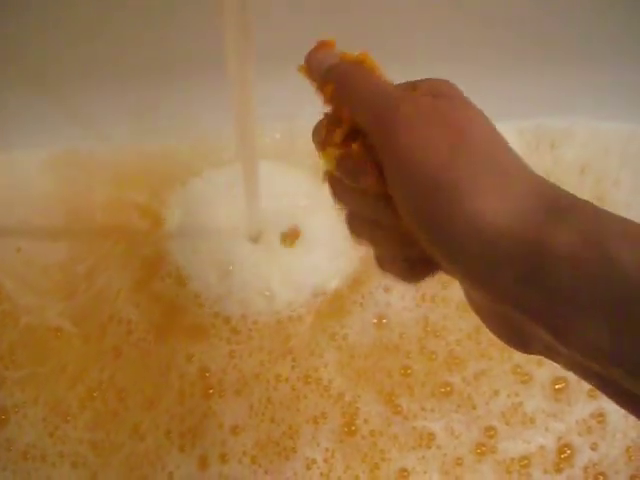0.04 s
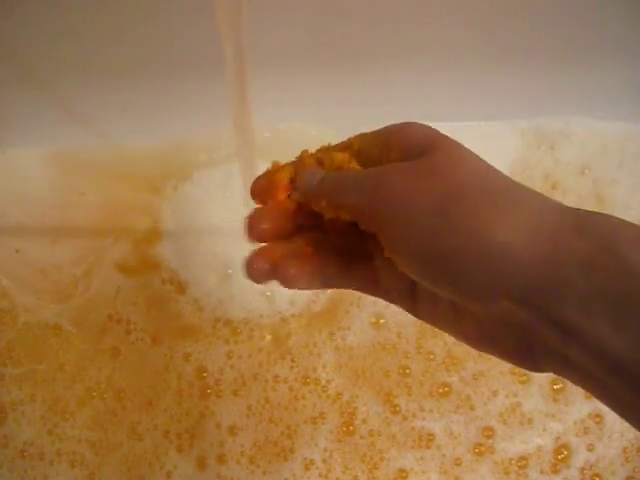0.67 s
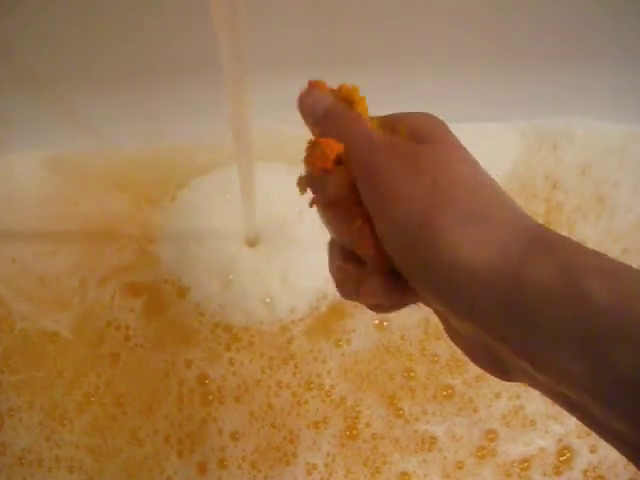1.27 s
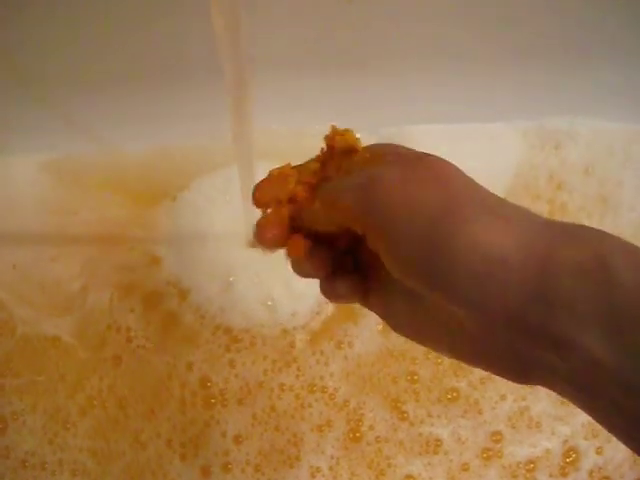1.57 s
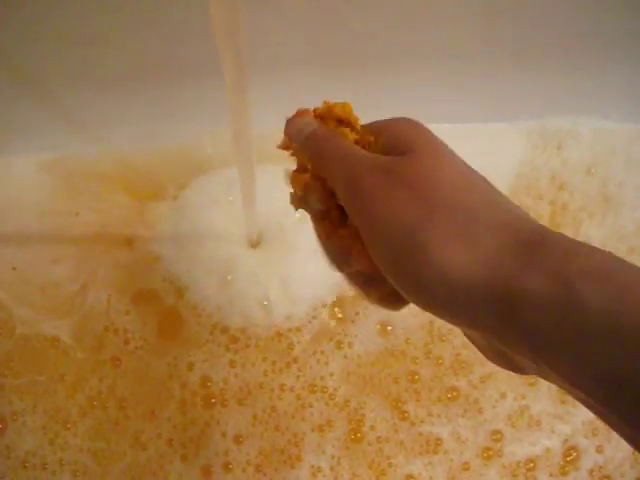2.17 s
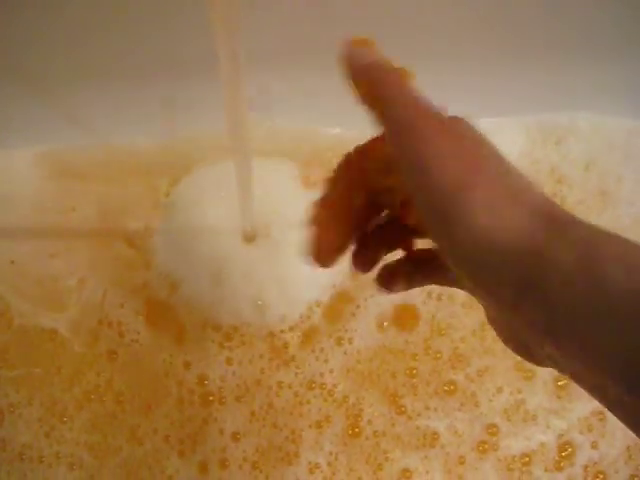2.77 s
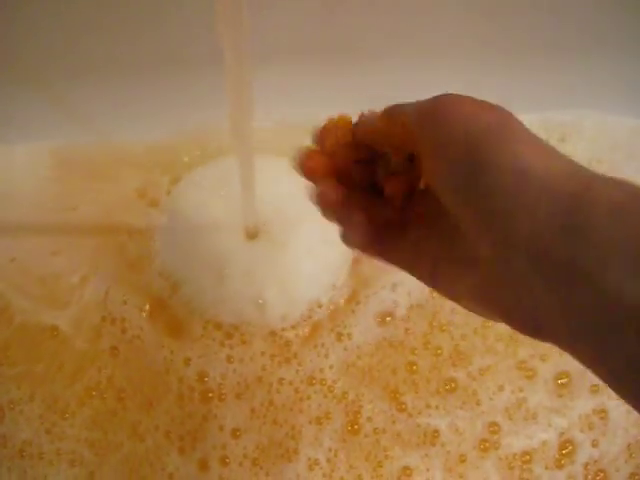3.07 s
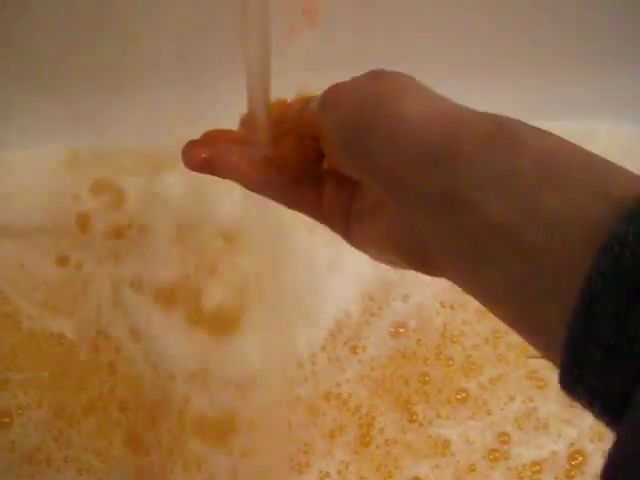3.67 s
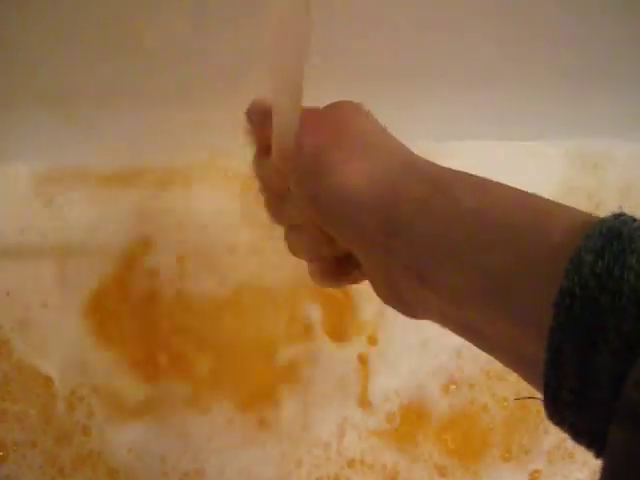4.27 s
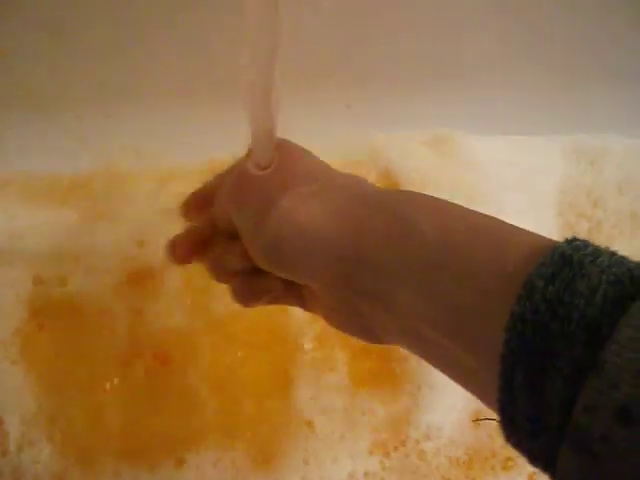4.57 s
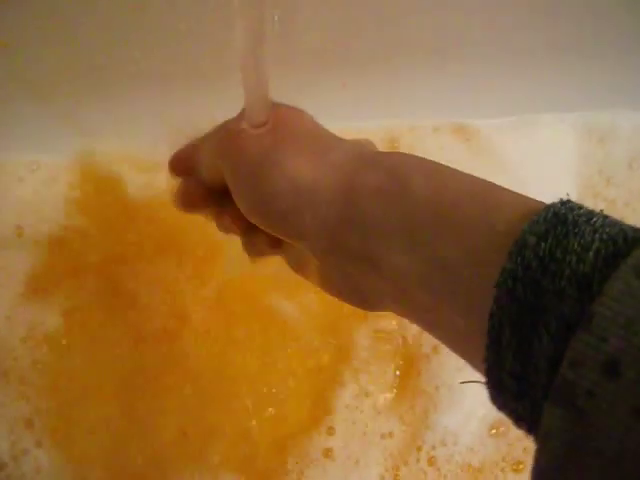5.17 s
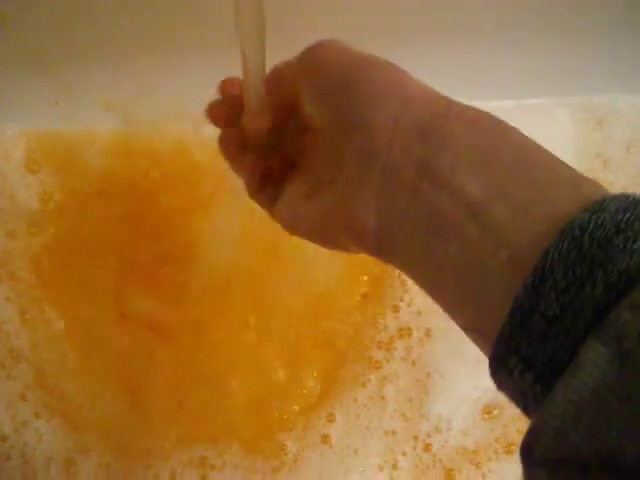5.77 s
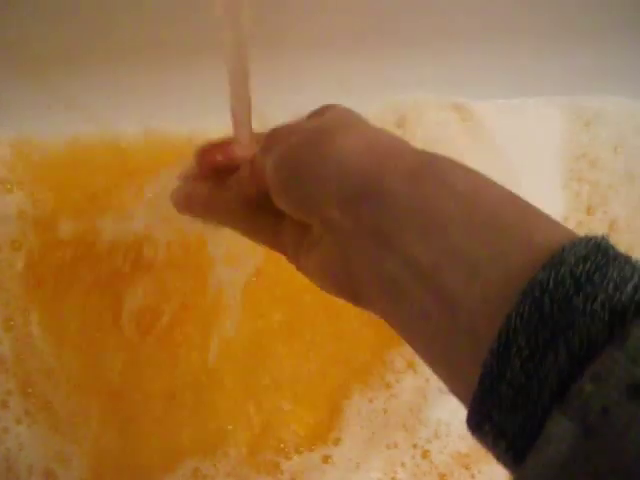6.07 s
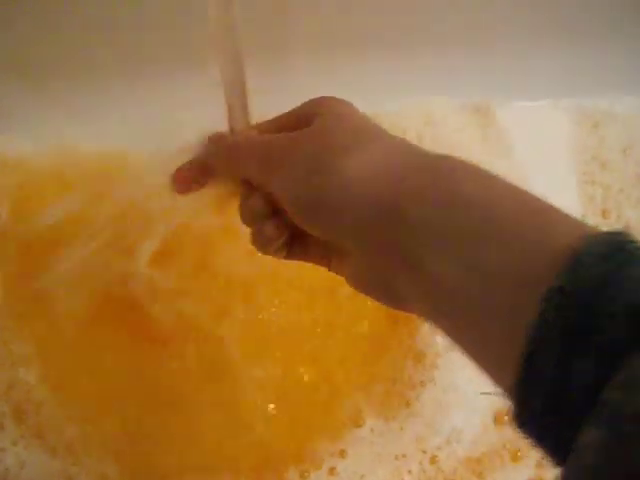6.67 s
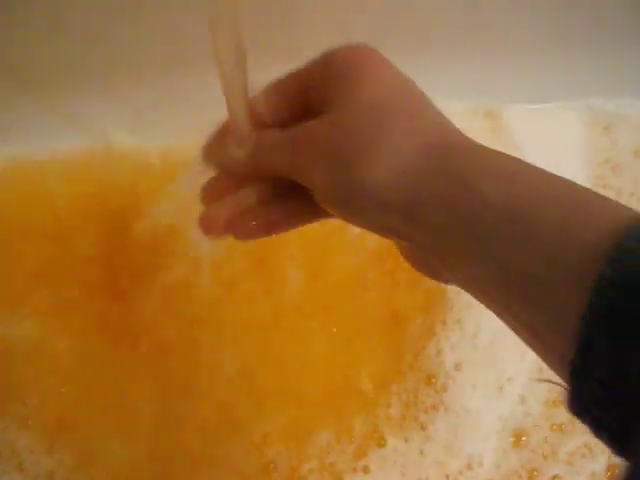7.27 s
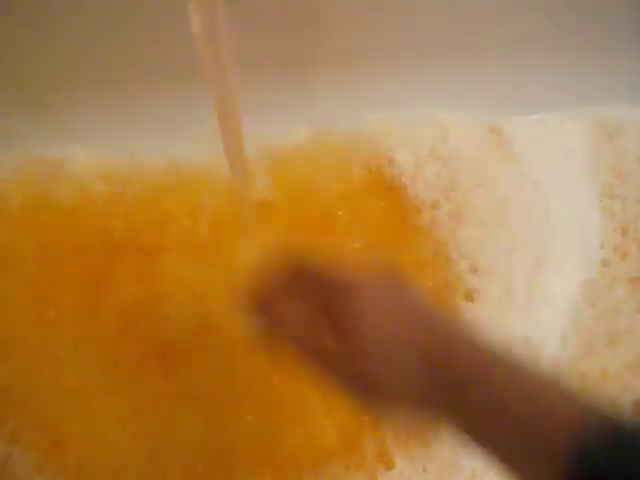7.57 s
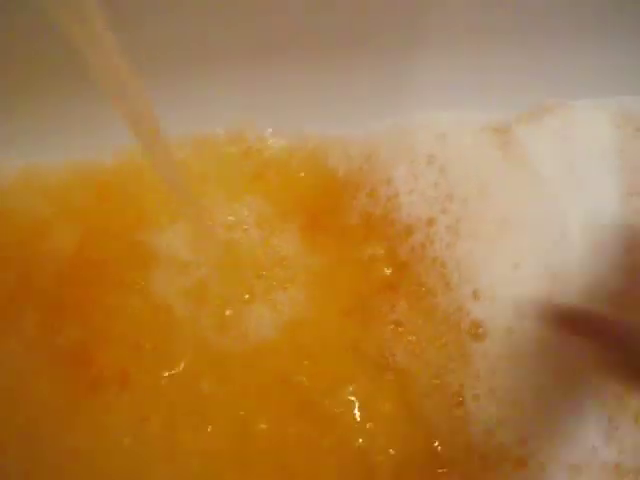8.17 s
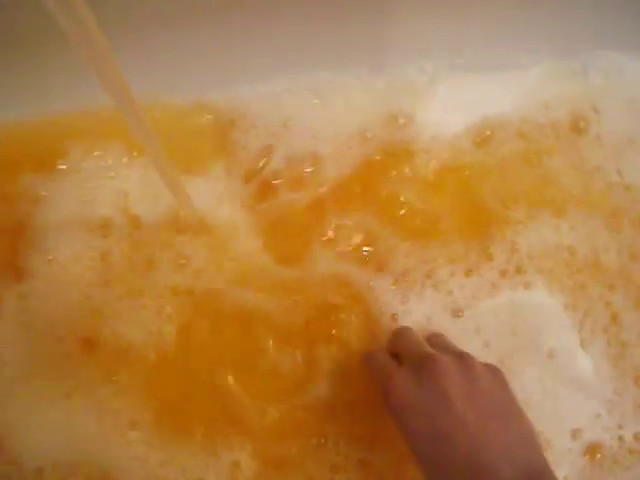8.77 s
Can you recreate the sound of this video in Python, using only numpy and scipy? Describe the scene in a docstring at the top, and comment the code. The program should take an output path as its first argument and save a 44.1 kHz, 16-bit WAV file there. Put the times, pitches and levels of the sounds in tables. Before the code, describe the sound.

Close above a bathtub in a small bathroom, running water gurgles softly under thick foam while the tub rumbles. The sound turns brighter and hissier as a hand cups the stream, filling and spilling in uneven splashes, with sharp drips and round gulps. The hand lets its last water fall with a splash and a few deep plops, leaving the stream to churn more heavily in open water.

```python
"""A bath tap pours into a foamy tub, heard from just above it in a small bathroom.
First the jet alone drives bubbles under the muffling foam; the tub booms and stray drops snap on top.
From about 3.5 s a hand under the stream fills and spills in turn, scattering bright spray,
plinks and gulping slops. Near 7.6 s it lets a last handful fall with low plops,
and the jet plunges into open water, fuller than before."""
import sys
import numpy as np
from scipy import signal
from scipy.fft import rfft, irfft, next_fast_len
from scipy.io import wavfile
from scipy.ndimage import uniform_filter1d, map_coordinates

SR = 44100
rng = np.random.default_rng(int(sys.argv[2]) if len(sys.argv) > 2 else 0)


def int16_out(signal):
    """Quantize to a 16-bit WAV file."""
    q = np.round(np.clip(np.atleast_2d(signal).T, -1, 1) * 32767)
    wavfile.write(sys.argv[1], SR, q.astype(np.int16))


N = 389403

# the jet's bed, weaker on the hand and stronger in open water: (time [s], level [dB])
JET_LEVEL = [(0, -35), (3.4, -35), (4.1, -39), (7.5, -38), (7.7, -28), (8.83, -30)]
# the cupped hand fills and less reaches the bath: (start [s], length [s])
HAND_HOLDS = [(3.547, 0.15), (4.005, 0.28), (5.337, 0.17), (5.976, 0.21), (7, 0.21)]
# the jet digs in and shakes the tub: (start [s], length [s], level [dB])
THUMPS = [(0.17, 0.18, -30), (0.573, 0.17, -30), (1.024, 0.1, -34.5), (1.442, 0.16, -32.5),
          (1.76, 0.13, -32), (2.645, 0.38, -30.5), (2.998, 0.33, -32.5), (3.477, 0.12, -34),
          (3.75, 0.32, -28.5), (4.196, 0.21, -35), (5.064, 0.17, -33.5), (7.115, 0.21, -36),
          (7.598, 0.17, -31.5), (7.726, 0.11, -26)]
# falling water drags air under: (start [s], length [s], large bubbles [dB], small bubbles [dB])
SURGES = [(0.16, 0.17, -36.5, -36.5), (0.34, 0.25, -39, -38), (0.916, 0.39, -35, -34.5),
          (1.478, 0.14, -38, -35.5), (1.653, 0.25, -34, -35), (2.365, 0.13, -34.5, -32),
          (2.707, 0.54, -38.5, -42.5), (3.21, 0.22, -34, -34.5), (3.69, 0.29, -37, -42),
          (4.233, 0.16, -42, -33.5), (4.855, 0.3, -47, -33.5), (5.056, 0.4, -39, -31),
          (5.447, 0.12, -36, -33.5), (5.607, 0.32, -58, -38), (6.203, 0.42, -36, -32),
          (6.534, 0.15, -33, -32.5), (6.783, 0.3, -45, -36.5), (7.63, 0.19, -34, -37),
          (8.31, 0.16, -45, -32)]
# steady patter off the hand, then off open water: (time [s], drops [dB], fine droplets [dB])
PATTER = [(3.5, -36, -38.5), (4.14, -59, -38.5), (4.3, -36, -37), (5.75, -32.5, -32), (6.07, -37, -35.5),
          (6.3, -34, -34.5), (7.05, -31.5, -35.5), (7.55, -32.5, -32.5), (7.75, -36, -40),
          (8.05, -31.5, -40), (8.47, -41, -50), (8.72, -34, -46.5)]
# the turning hand flings a sheet of water: (start [s], length [s], drops [dB], fine droplets [dB])
SPLASHES = [(3.496, 0.11, -38, -34.5), (3.774, 0.14, -33.5, -33.5), (3.907, 0.22, -35, -33),
            (4.178, 0.18, -31.5, -36), (4.376, 0.11, -32.5, -33), (4.52, 0.12, -36, -33.5),
            (4.69, 0.12, -32.5, -48), (5.199, 0.11, -26.5, -32.5), (5.797, 0.21, -32.5, -26),
            (6.161, 0.1, -29.5, -41), (6.314, 0.17, -31.5, -33), (7.148, 0.15, -28.5, -31),
            (7.307, 0.18, -30.5, -33.5), (7.578, 0.055, -22, -23), (7.626, 0.11, -30.5, -31),
            (7.81, 0.11, -30.5, -34), (8.374, 0.063, -32.5, -50)]
# stray drops on the foam: (time [s], peak [dB])
SNAPS = [(0.2105, -24.5), (0.2425, -21.5), (0.4403, -20), (0.581, -23), (0.694, -23.5), (0.7846, -24),
         (1.036, -26.5), (1.131, -24.5), (1.2145, -22.5), (1.445, -24.5), (1.5435, -19.5), (2.774, -19.5),
         (3.3093, -19)]
# a handful opens a cavity in the bath: (start [s], length [s], level [dB])
SLOSHES = [(3.687, 0.25, -38.5), (3.923, 0.51, -43), (7.702, 0.11, -36.5)]
# the last handful lands: (time [s], peak [dB], pitch [Hz])
PLOPS = [(7.612, -20, 86), (7.675, -19.5, 310), (7.752, -22, 115), (7.776, -24.5, 159)]
# sharp drop impacts: (time [s], peak [dB], pitch [Hz])
PLINKS = [(3.7752, -13.5, 4220), (3.8112, -17, 2840), (4.0203, -16, 2900), (4.2403, -15.5, 3040),
          (4.273, -9, 5150), (4.613, -15, 2470), (4.702, -14, 4430), (5.255, -11.5, 4340),
          (5.2701, -9, 4280), (5.2915, -13, 4130), (6.124, -11, 4730), (6.1547, -15.5, 3210),
          (6.6725, -15, 2800), (6.945, -14, 1960), (8.1519, -14, 3170), (8.378, -18.5, 2350)]
# a tongue of water slaps the bath: (start [s], length [s], starting level [dB])
SLAPS = [(4.235, .05, -29), (4.61, 0.046, -21.5), (5.2, .07, -22.5), (5.745, .04, -22.5),
         (5.85, .06, -21.5)]
# the hand tips out a glugging run: (start [s], length [s], starting level [dB])
SPILLS = [(4.391, .1, -24.5), (5.738, .07, -24), (7.17, 0.13, -22.5), (7.419, 0.13, -24)]
# single air pockets closing: (time [s], peak [dB], pitch [Hz])
GULPS = [(0.493, -21.5, 880), (1.034, -24, 940), (1.827, -26, 783), (2.357, -26, 796), (2.836, -18.5, 865),
         (3.309, -20, 830), (3.475, -21, 1040), (3.652, -23, 1010), (4.286, -19, 730), (4.844, -16.5, 906),
         (4.955, -10.5, 890), (5.126, -10.5, 816), (5.142, -11, 830), (5.466, -20.5, 740),
         (5.677, -14.5, 856), (5.883, -21, 710), (5.913, -16.5, 810), (5.931, -16, 740), (6.363, -14, 920),
         (7.486, -13, 884), (7.62, -11.5, 750), (8.718, -12.5, 815)]
# low resonances of the filled tub and room: (frequency [Hz], width [Hz], gain [dB])
TUB_MODES = [(68.3, 2.2, -10), (83, 5, -11), (96.46, 3.6, 5.5), (134.6, 5, -4.5), (160, 6.9, -19),
             (314.7, 19, -7.5)]
# hollow ring of the tub's walls: (frequency [Hz], width [Hz], lift [dB])
WALL_MODES = [(674.3, 6.1, 5.5), (887.6, 16, 3)]
# EQ curves of the bubble and drop layers: (frequency [Hz], relative gain [dB])
CAVITY_EQ = [(90, -32), (170, 3.5), (240, -2.5), (330, 3.5), (450, -14), (900, -51)]
DROP_EQ = [(740, -22.5), (1250, -1.5), (1480, -8), (2760, 3), (3720, -2), (4200, -21), (5460, -36.5)]
DROPLET_EQ = [(2120, -10.5), (3600, -3), (5030, -2.5), (5510, -12.5), (6210, -15), (6510, -25.5)]
DEEP_EQ = [(100, -33.5), (170, 0), (205, -14), (301, 1.5), (355, -6), (461, -1), (640, -0.5), (830, -39)]
GURGLE_EQ = [(320, -34.5), (540, -17), (695, -1), (879, -0.5), (1020, -1), (1190, -9), (1500, -30.5),
             (1950, -50.5)]
FOAM_EQ = [(760, -28), (1300, 0), (1850, -4), (2450, -4), (3900, -8), (4800, -8.5), (6190, -23),
           (7200, -48)]


def amp(db):
    """Decibels to gain."""
    return 10 ** (np.asarray(db) / 20)


def unit(x):
    """Scale to rms 1."""
    return x / np.sqrt(np.mean(x ** 2) + 1e-20)


def wobble(rate):
    """Smooth random modulation, rate knots a second."""
    return map_coordinates(rng.standard_normal(int(N * rate / SR) + 4), [np.arange(N) * rate / SR])


def automation(rows):
    """One per-sample curve for each column after the time."""
    times, *columns = np.transpose(rows)
    return [np.interp(np.arange(N) / SR, times, column) for column in columns]


def envelope(bed_db, bursts, skew, column=0):
    """Gain of a steady bed plus arched bursts; skew under 1 makes attack quicker than release."""
    t, power = np.arange(N) / SR, amp(bed_db) ** 2
    for start, length, *levels_db in bursts:
        inside = (t > start) & (t < start + length)
        arch = np.sin(np.pi * ((t[inside] - start) / length) ** skew)
        power[inside] += (amp(levels_db[column]) * arch) ** 2
    return np.sqrt(power)


def filtered(x, response):
    """Filter x by a complex response, given as a function of frequency."""
    size = next_fast_len(N + SR // 2)
    return irfft(rfft(x, size) * response(np.fft.rfftfreq(size, 1 / SR)), size)[:N]


def equalised(x, eq):
    """x through an EQ curve on a log frequency axis, at rms 1."""
    points_hz, db = np.transpose(eq)
    return unit(filtered(x, lambda hz: amp(np.interp(np.log(hz + 1), np.log(points_hz), db))))


def resonance(hz, centre, width):
    """Band-pass response of one mode, 1 at its centre."""
    return 1j * hz * width / (centre ** 2 - hz ** 2 + 1j * hz * width)


def bathroom(x, wet_db, t60=0.26):
    """Direct sound plus the short, dense reverb of tub and walls, at about the same power."""
    t = np.arange(SR // 2) / SR
    tails = rng.standard_normal((2, len(t))) * amp(-60 * t / t60) * (t > .002)
    wet_a, wet_b = signal.fftconvolve(x[None], tails / np.linalg.norm(tails[0]), axes=1)[:, :N]
    blend = wobble(3)  # the heaving surface keeps changing the paths
    reverb = wet_a * np.cos(blend) + wet_b * np.sin(blend)
    return (x + amp(wet_db) * reverb) / np.hypot(1, amp(wet_db))


def side_wall(x, delay_s=0.00429, echo_db=-12):
    """One hard reflection off the tub's side gives the jet's landing spot a hollow colour."""
    echo = amp(echo_db) * np.pad(x, (round(delay_s * SR), 0))[:N]
    return (x + echo) / np.hypot(1, amp(echo_db))


def bubbles(rate, low_hz, high_hz, cycles, spread_db, rise):
    """A cloud of damped rings, rate a second; rise bends each upward as it nears the surface."""
    count = int(rate * N / SR)
    onset, pitch, life, size, sign = rng.random((count, 5)).T[:, :, None]
    hz = low_hz + (high_hz - low_hz) * pitch
    t60 = cycles * (.5 + life) / hz
    t = np.arange(min(int(cycles / low_hz * SR), 5000000 // count)) / SR
    accent_db = -spread_db * np.log(1 - .99 * size)  # a few stand out from the rest
    gain = amp(accent_db) * np.sign(sign - .5) / np.sqrt(t60)
    rings = gain * amp(-60 * t / t60) * np.sin(2 * np.pi * hz * t * (1 + rise * t / t60 / 2))
    index = (onset * N).astype(int) + np.arange(len(t))
    return unit(np.bincount(index.ravel(), rings.ravel(), N)[:N])


def water(cloud, eq, wash_db, wet_db):
    """Distinct bubbles in the room over a noise wash of countless faint ones, at rms 1."""
    return equalised(bathroom(cloud, wet_db) + amp(wash_db) * rng.standard_normal(N), eq)


def pops(rows, cycles, attack_cycles, rise, wet_db):
    """One-shot air pockets in the room: each swells, rings down and bends upward by rise."""
    track, t = np.zeros(N), np.arange(SR // 10) / SR
    for start, db, hz in rows:
        age = hz * t / cycles
        shape = amp(-60 * age) * (1 - np.exp(-hz * t / attack_cycles))
        ring = amp(db) * shape / shape.max() * np.sin(2 * np.pi * hz * t * (1 + rise * age / 2))
        slot = track[round(start * SR):][:len(ring)]
        slot += ring[:len(slot)]
    return bathroom(track, wet_db)


def volley(runs, first_hz, last_hz, scatter, fade_db, count, uneven_db=2.0):
    """Quick, uneven runs of pockets drifting in size, as rows of (time [s], peak [dB], pitch [Hz])."""
    rows = []
    for start, length, db in runs:
        slip, accent, detune = rng.standard_normal((count, 3)).T
        progress = (np.arange(count) + .5 + np.tanh(slip) / 2) / count
        hz = first_hz * (last_hz / first_hz) ** progress * np.exp(scatter * detune)
        rows += zip(start + length * progress, db + uneven_db * accent - fade_db * progress, hz)
    return rows


def hand_hold():
    """How firmly the cupped hand holds the stream back, 0-1."""
    t = np.arange(N) / SR
    return sum(np.sin(np.pi * np.clip((t - start) / length, 0, 1)) for start, length in HAND_HOLDS)


def jet_db(duck_db=-3):
    """Level of the jet that reaches the bath: it ducks while the hand fills."""
    return automation(JET_LEVEL)[0] + duck_db * hand_hold()


def tub_boom(leveller_s=0.1, trim_db=-2.5, unrest_db=3.0, ceiling_db=-31.5):
    """The jet's turbulence shakes the tub's low modes; open water cushions its hardest pounding."""
    turbulence_eq = [(25, 3), (50, -13.5), (63, 6.5), (320, -16.0), (600, -37.0)]
    turbulence = equalised(rng.standard_normal(N), turbulence_eq)
    hum = filtered(turbulence, lambda hz: sum(
        amp(db) * resonance(hz, centre, width) for centre, width, db in TUB_MODES))
    # level the hum so that the pounding alone sets the slow swells
    hum /= np.sqrt(np.abs(uniform_filter1d(hum ** 2, int(leveller_s * SR))) + 1e-20)
    pounding_db = np.minimum(jet_db(), ceiling_db) + trim_db + unrest_db * wobble(18)
    return hum * envelope(pounding_db, THUMPS, skew=0.75)


def foam_snaps(typical_hz=2930, scatter=0.08):
    """Stray drops hit the foam with soft snaps only a few cycles long."""
    pitches = typical_hz * np.exp(scatter * rng.standard_normal(len(SNAPS)))
    rows = [(start, db, hz) for (start, db), hz in zip(SNAPS, pitches)]
    return side_wall(pops(rows, cycles=6.4, attack_cycles=2.5, rise=0, wet_db=-4))


def sloshes():
    """The cavity under a falling handful breaks up into very large, low bubbles."""
    cloud = bubbles(rate=190, low_hz=151, high_hz=370, cycles=2.3, spread_db=0, rise=0.1)
    body = water(cloud, CAVITY_EQ, wash_db=-1, wet_db=2.5)
    return body * envelope(np.full(N, -np.inf), SLOSHES, skew=0.67)


def plops():
    """The released handful lands with low, roomy plops."""
    return pops(PLOPS, cycles=17, attack_cycles=0.37, rise=0.14, wet_db=6.5)


def slaps():
    """A slap traps large air pockets first, then ever smaller ones as it shatters."""
    rows = volley(SLAPS, first_hz=1310, last_hz=2870, scatter=0.27, fade_db=2, count=10)
    return pops(rows, cycles=8.4, attack_cycles=0.48, rise=0.13, wet_db=-5)


def spills():
    """The hand pours itself out: the air pockets grow, so the glugs fall in pitch as they fade."""
    rows = volley(SPILLS, first_hz=1086, last_hz=642, scatter=0.034, fade_db=8.5, count=8)
    return pops(rows, cycles=53, attack_cycles=0.66, rise=0.058, wet_db=-6)


def plinks():
    """Drops strike the hand and open water with bright upward chirps."""
    return pops(PLINKS, cycles=24, attack_cycles=0.88, rise=0.14, wet_db=-5)


def gulps():
    """Single air pockets close, each with a round midrange note."""
    return pops(GULPS, cycles=21.3, attack_cycles=0.45, rise=0.025, wet_db=-7.5)


def spray(spatter_db=0.65, hand_in_s=3.46, fade_in_s=0.034, heavy_hz=2300, duck_db=-6):
    """Drops thrown off the hand patter on open water: tiny rings and a fine crackling hiss."""
    drops_db, droplets_db = automation(PATTER)
    fade_in = np.clip((np.arange(N) / SR - hand_in_s) / fade_in_s, 0, 1)
    drops = bubbles(rate=1300, low_hz=1169, high_hz=4470, cycles=36, spread_db=3, rise=0.052)
    drops = water(drops, DROP_EQ, wash_db=0, wet_db=-6)
    droplets = bubbles(rate=1500, low_hz=3734, high_hz=6670, cycles=32, spread_db=5, rise=0.23)
    droplets = water(droplets, DROPLET_EQ, wash_db=1.5, wet_db=-10.5)
    # the heaviest drops come in fits and duck when the hand fills
    heavy = filtered(drops, lambda hz: 1 / (1 + (hz / heavy_hz) ** 10))
    drops += heavy * (amp(duck_db * hand_hold() + 2 * spatter_db * wobble(16)) - 1)
    # each size lands in its own clusters
    drops *= envelope(drops_db, SPLASHES, skew=0.8, column=0) * amp(spatter_db * wobble(35))
    droplets *= envelope(droplets_db, SPLASHES, skew=0.49, column=1) * amp(spatter_db * wobble(35))
    return fade_in * (drops + droplets)


def jet_plunge(deep_db=-1.62, large_bed_db=-5, small_bed_db=-1.05, foam_db=-24, foam_follow=0.6):
    """Bubbles ring under the jet; the foam above crackles faintly in step with the small ones."""
    large_gain = envelope(jet_db() + large_bed_db, SURGES, skew=0.73, column=0)
    small_gain = envelope(jet_db() + small_bed_db, SURGES, skew=0.68, column=1)
    deep = bubbles(rate=600, low_hz=193, high_hz=680, cycles=6, spread_db=1.5, rise=0.14)
    deep = water(deep, DEEP_EQ, wash_db=1.5, wet_db=-3.5)
    gurgle = bubbles(rate=1200, low_hz=483, high_hz=1597, cycles=11.2, spread_db=2, rise=0.18)
    gurgle = water(gurgle, GURGLE_EQ, wash_db=-4.5, wet_db=-8.5)
    gurgle = unit(filtered(gurgle, lambda hz: 1 + sum(
        (amp(db) - 1) * resonance(hz, centre, width) for centre, width, db in WALL_MODES)))
    crackle = bubbles(rate=170, low_hz=2400, high_hz=3530, cycles=7.7, spread_db=3, rise=0)
    crackle = side_wall(water(crackle, FOAM_EQ, wash_db=5.5, wet_db=-3))
    crackle *= small_gain ** foam_follow * amp(foam_db)
    flutter = amp(0.84 * wobble(22))  # the jet swallows air unevenly
    return deep * large_gain * amp(deep_db) + flutter * (gurgle * small_gain + crackle)


def scene():
    """Mono mix: one-shot accents, the running bath and the hand's splashing."""
    accents = gulps() + plinks() + plops()
    bath = tub_boom() + jet_plunge() + foam_snaps()
    hand = spray() + sloshes() + spills() + slaps()
    return (accents + bath + hand)[None]


def record(dry):
    """Master low-pass: the treble rolls off steeply, then cuts out altogether."""
    roll_hz, top_hz = 6600, 7200
    return filtered(dry[0], lambda hz: (hz < top_hz) / np.sqrt(1 + (hz / roll_hz) ** 60))[None]


dry = scene()
out = record(dry)
int16_out(out)
```